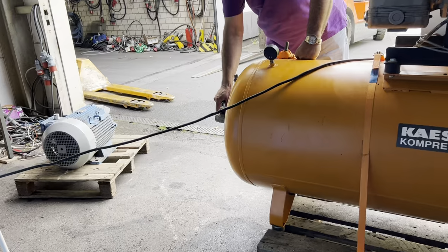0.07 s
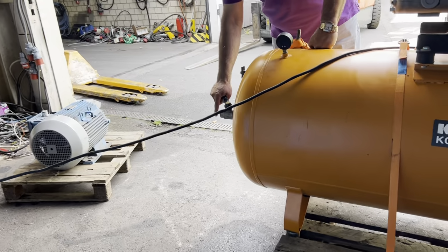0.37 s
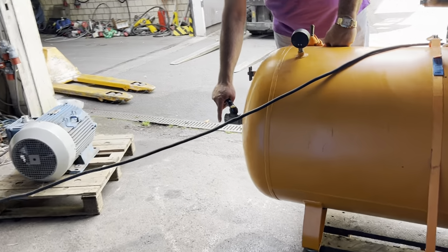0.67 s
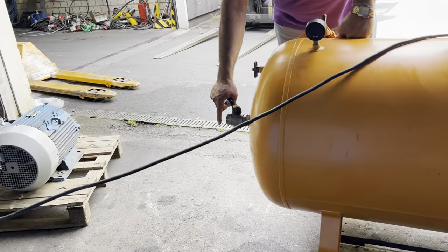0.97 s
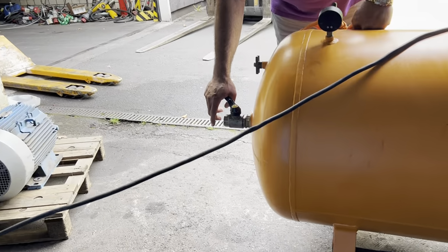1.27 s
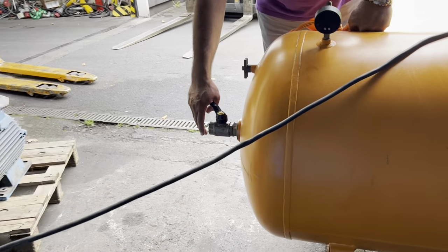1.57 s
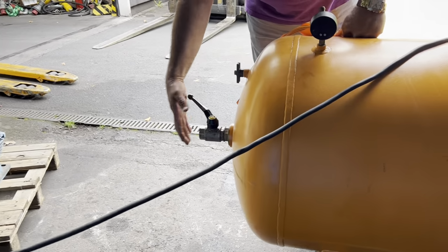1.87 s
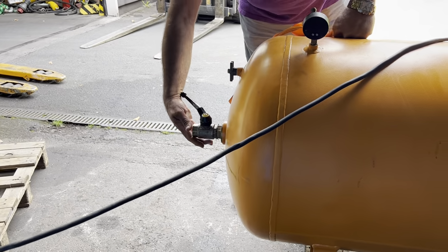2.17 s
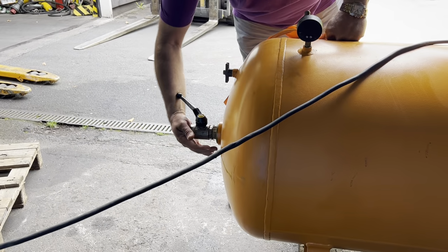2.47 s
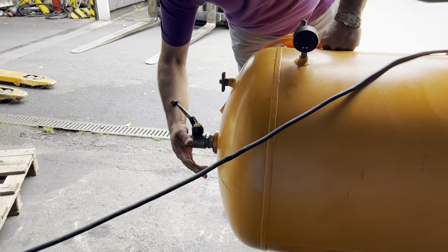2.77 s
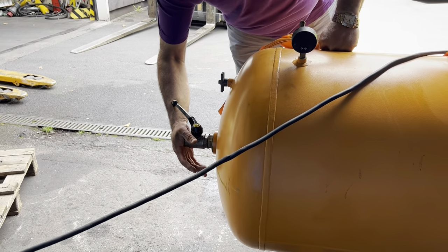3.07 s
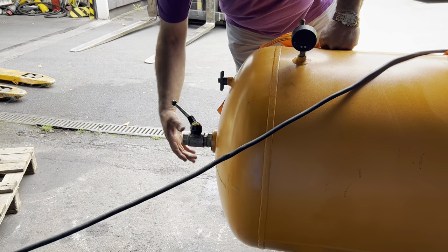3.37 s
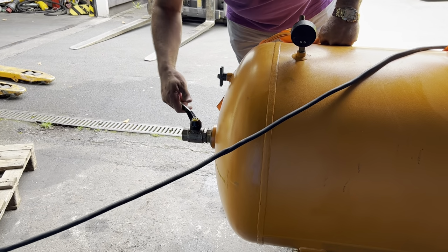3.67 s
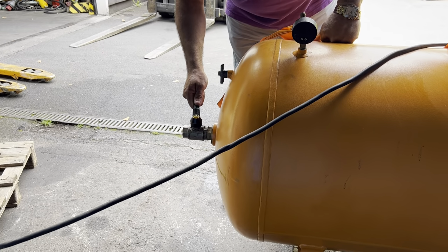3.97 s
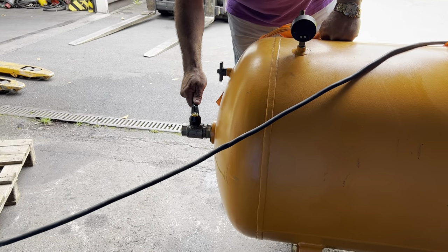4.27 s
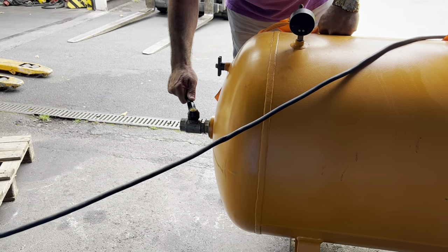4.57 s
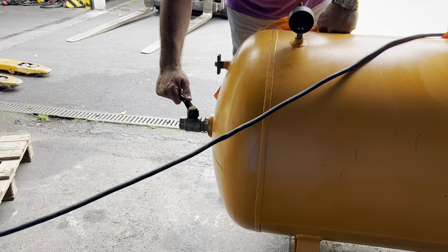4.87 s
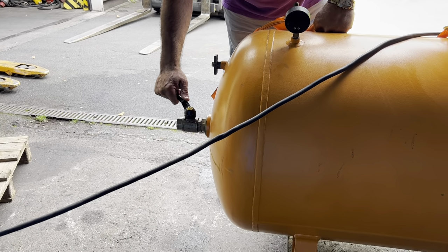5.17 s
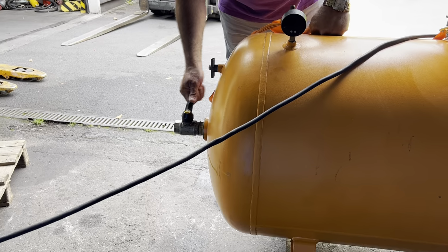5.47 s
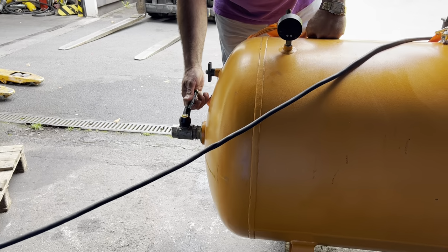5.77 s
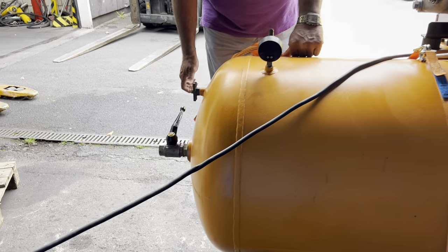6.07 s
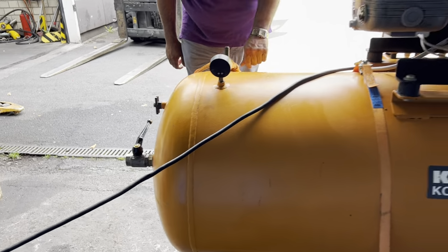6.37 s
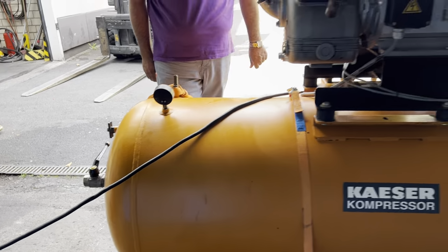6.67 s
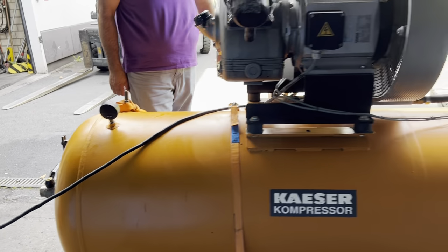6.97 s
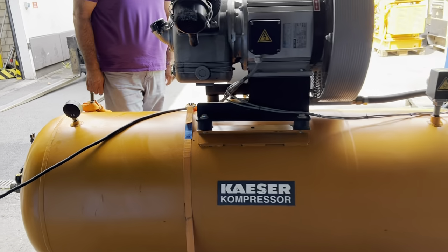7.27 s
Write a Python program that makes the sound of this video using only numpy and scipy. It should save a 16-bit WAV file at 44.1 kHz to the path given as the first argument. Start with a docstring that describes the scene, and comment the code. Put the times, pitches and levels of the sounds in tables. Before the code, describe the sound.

In a walled concrete yard, a diesel engine idles steadily while air roars and hisses from a tank valve close to the microphone. The first burst is long and gets choked by a hand, the second is a short puff, and the third follows a brief gap as the lever is opened again. Once the valve closes, only the engine remains, chugging and clattering, with a few sharper knocks.

```python
"""Compressed air bursts from the ball valve of a compressor tank in a walled, concrete yard.
A hand works the lever twice; in the first release the palm covers the outlet and lets go, so three
bursts are heard. The jet roars in the outlet pipe, hisses off the hand and the concrete, and fizzes at
the valve seat, weaker as the tank empties. Behind it a diesel engine idles throughout. The stereo
microphone, two closely spaced ports, moves slowly about a metre past the tank and steps back."""
import sys
import numpy as np
from scipy import signal
from scipy.fft import rfft, irfft
from scipy.io import wavfile
from scipy.ndimage import uniform_filter1d

SR = 44100
rng = np.random.default_rng(int(sys.argv[2]) if len(sys.argv) > 2 else 0)


def wrap_up_sound(samples):
    """Save the sound to the file named by the first command line argument, as 16-bit audio."""
    columns = np.atleast_2d(samples).T
    # keep every value between -1 and 1, then stretch to whole-number steps
    tamed = np.clip(columns, -1, 1)
    steps = np.round(tamed * 32767).astype(np.int16)
    wavfile.write(sys.argv[1], SR, steps)


N = 322371
T = np.arange(N) / SR
FRAME, HOP = 1024, 256
HZ = np.fft.rfftfreq(FRAME, 1 / SR)
FRAME_S = np.arange(N // HOP + 5) * HOP / SR
FIRING_HZ = 24.744

# the palm closes over the outlet, slips a little and lets go: t/s, cover/0-1
PALM_COVER = [(2.0, 0.15), (2.17, 0.21), (2.5, 0.15), (2.72, 0.48), (2.84, 0.82), (2.99, 0.97), (3.1, 0.9),
              (3.15, .66), (3.21, 0.74), (3.3, 0)]
# how openly the microphone faces the engine block: t/s, share/0-1
FACING_ENGINE = [(0, 0.5), (2.4, .42), (4.3, .42), (5.8, 0.53), (6.2, 0.58), (6.7, 0.93)]
# stereo image of engine and draught: f/Hz, left minus right/dB, left lead/rad, likeness/0-1
YARD_IMAGE = [(50, -1, 0, .98), (170, -3, -.35, .97), (500, -2.7, -.6, .65), (900, -3.4, -1, .35),
              (1750, -1.5, -1, .55), (3400, 1, 1.3, .2), (4600, 3, 1, .6), (5800, 9, -2, .5),
              (7000, 1.6, 0, .8), (8800, 1, -1.7, .8), (9700, 0, -3.1, .99), (10600, 0, -3.2, .99),
              (11200, 0, -4, .82), (12700, 0, -6.2, .95), (14400, 0, -6.3, .96), (15700, 0, -8.5, .92)]


def air_jet(flutter_db=0.18, flutter_hz=40):
    """Roar in the pipe, hiss off hand and concrete, fizz at the seat: all share resonances and flutter."""
    # spectra of the three parts: f/Hz, level/dB
    roar_spectrum = [(100, -49), (350, -35), (900, -13.5), (1300, -8), (1900, -1.5), (2700, 1.5),
                     (3600, -1), (4400, -8), (7000, -46)]
    hiss_spectrum = [(1500, -12), (3200, -5.5), (4200, 2), (5200, 3.5), (6400, 0), (7400, -3.5),
                     (9500, -11.5), (12000, -120)]
    fizz_spectrum = [(3000, -21), (7500, 3), (9800, -3.5), (11400, 5), (12700, 0.5), (14000, -0.5),
                     (15600, -1.5), (17000, -25)]
    shaping = outlet() * whistles() * ground_bounce() * reflections() * shimmer()
    roar_gain = flow(level_db=-21.5, lever_power=0.85, sag_db_per_s=-1.09,
                     palm_db=-22.0, palm_power=1.18, splash_db=3.0, puff_db=2.5, yard_db=-10.5)
    hiss_gain = flow(level_db=-22.0, lever_power=1.19, sag_db_per_s=-1.54,
                     palm_db=-20, palm_power=1.42, splash_db=1.1, puff_db=-0.5, yard_db=-6.0)
    fizz_gain = flow(level_db=-27.0, lever_power=0.95, sag_db_per_s=-0.77,
                     palm_db=-8.0, palm_power=1.0, splash_db=3.5, puff_db=5.5, yard_db=-14)
    roar = turbulence(roar_spectrum, shaping, roar_gain, eddies_db=0.9, surge_db=-0.13)
    hiss = turbulence(hiss_spectrum, shaping, hiss_gain, eddies_db=1.97, surge_db=0.5)
    fizz = turbulence(fizz_spectrum, shaping, fizz_gain, eddies_db=1.9, surge_db=0.4)
    return (roar + hiss + fizz) * amp(flutter_db * wander(flutter_hz))


def turbulence(spectrum, shaping, gain, eddies_db, surge_db, surge_hz=14):
    """One region of the jet: noise blotched by eddies, surging a little about the flow."""
    # stereo image of the jet: f/Hz, left minus right/dB, left lead/rad, likeness/0-1
    jet_image = [(100, -2, 0, .95), (600, -1, -.6, .5), (1000, 0, .7, .6), (2000, -.3, .6, .62),
                 (2800, 1, 1.6, .58), (4000, 3, 1.6, .55), (5400, 11, 1.8, .2), (6400, 7, .7, .25),
                 (7100, 4, -.1, .6), (8800, 1.5, -1.9, .7), (9600, 0, -3.1, .99), (10500, 0, -3.15, .99),
                 (11200, 0, -4, .8), (12700, 0, -6.2, .93), (14400, 0, -6.3, .95), (15700, 0, -8.6, .88)]
    colour = amp(over_hz(spectrum, HZ)) * shaping
    colour /= np.linalg.norm(colour, axis=1, keepdims=True)  # resonances share out the flow's power
    surge = amp(surge_db * wander(surge_hz))
    eddies = amp(eddies_db * patches(frames=7, bins=9))
    return gain * surge * noise(colour * eddies, jet_image)


def flow(level_db, lever_power, sag_db_per_s, palm_db, palm_power, splash_db, puff_db, yard_db):
    """Jet gain: it follows the lever, sags as air is spent, chokes under the palm and puffs when freed."""
    # the fingers feel their way into the jet: t/s, splash strength/factor
    fingers = [(.8, 0.65), (1.7, 1.18), (2.1, 0.93), (2.45, 0.026)]
    puff_s, yard_t60_s = 0.074, 0.68
    opening = lever(T)
    spent_s = np.cumsum(opening) / SR
    since_freed = T - PALM_COVER[-1][0]
    puff = (since_freed > 0) * np.exp(-abs(since_freed) / puff_s)  # air dammed behind the palm
    hand_db = palm_db * palm(T) ** palm_power + splash_db * over_time(fingers, T) + puff_db * puff
    db = level_db + sag_db_per_s * spent_s + hand_db
    direct = uniform_filter1d(opening ** lever_power * amp(db), size=700)
    # the yard walls hold each burst for a moment
    decay = np.exp(-2 * np.log(1000) / (yard_t60_s * SR))
    yard_power = signal.lfilter([1 - decay], [1, -decay], (amp(yard_db) * direct) ** 2)
    return np.sqrt(direct ** 2 + yard_power)


def lever(t, crack_s=0.15, shut_s=0.1):
    """Opening of the valve, 0-1: it cracks, swings wide, holds and shuts."""
    # pulls: crack t/s, opening while cracked/0-1, swing t/s, swing time constant/s, shut t/s
    pulls = [(-.1, 0.13, 0.13, 0.16, 3.77), (4.41, 0.37, 4.675, 0.065, 5.316)]
    opening = 0
    for crack_at, seep, swing_at, swing_s, shut_at in pulls:
        cracked = 1 - np.exp(-np.maximum(t - crack_at, 0) / crack_s)
        swung = 1 - np.exp(-np.maximum(t - swing_at, 0) / swing_s)
        held = np.exp(-(np.maximum(t - shut_at, 0) / shut_s) ** 2)
        opening += (seep * cracked + (1 - seep) * swung) * held
    return np.clip(opening, 0, 1)


def palm(t):
    """How far the palm covers the outlet, 0-1."""
    return over_time(PALM_COVER, t)


def outlet(ring_cracked=1.1, ring_open=1.0, palm_damping=0.2):
    """Pipe and valve resonate with the grip: most when barely open, less under the palm."""
    # outlet resonances: f/Hz, width/Hz, then base lift/dB for each of the seven grips
    resonances = [(1000, 220, 1.5, 3.5, -0.5, -4.5, -6.5, -8.5, -4.5),
                  (1030, 60, -2.5, -0.5, 1.5, 6.0, 7.5, 8.5, 2.0),
                  (1120, 60, 0.5, -2.5, 1.5, 3.0, 6.5, 6.0, 0.0),
                  (1240, 90, 1.0, 2.5, 1.0, -0.5, 5.0, 2.5, 4.5),
                  (1435, 90, 1.5, 0.5, 0.5, 3.5, 3.5, -1.0, -3.0),
                  (1585, 90, 1.0, -0.5, -0.5, 3.0, 4.5, 4.0, 4.0),
                  (1705, 60, 0.0, 1.0, 0.0, -5.5, 1.5, 0.5, -0.5),
                  (1825, 60, 0.0, -0.5, 1.0, 3.5, 1.5, 7.5, 1.0),
                  (1975, 90, 4.0, 1.5, 6.0, 6.0, 4.0, 5.5, 5.0),
                  (2185, 60, 0.0, -1.5, 2.0, 6.0, -0.5, 2.5, 3.0),
                  (2380, 60, 2.5, 1.0, 0.5, 1.5, 0.5, 3.0, 5.5),
                  (2620, 140, 1.5, 2.5, 1.5, 0.0, -0.5, -0.5, 0.5),
                  (2800, 60, 1.0, 1.0, 2.5, 1.0, 1.0, 5.0, 7.5),
                  (3070, 220, -0.5, -1.0, 1.5, 2.0, 0.0, 2.5, 3.0),
                  (3385, 90, 2.0, 2.0, 1.0, 1.5, 0.5, 5.0, 6.0),
                  (3685, 220, 2.0, 3.5, 2.0, 2.0, -0.5, 0.5, 1.0),
                  (3910, 90, 2.5, 0.5, 2.0, -2.5, 1.0, -5.0, -4.0),
                  (4225, 60, 1.5, 0.5, 1.5, 2.0, 1.5, 5.0, 4.0),
                  (4585, 90, 0.0, 0.5, 1.5, 5.5, 5.0, 3.0, 1.5),
                  (4840, 140, 2.0, 5.0, 0.5, -1.0, -0.5, -5.0, -4.5),
                  (5050, 90, 6.0, 2.0, 3.0, 1.0, 3.5, 5.0, 0.5),
                  (5380, 90, 4.5, 4.0, -0.5, 3.0, 1.5, 3.0, 3.5),
                  (5485, 60, -5.5, -3.5, -6.0, -1.5, -0.5, -3.0, -0.5),
                  (5620, 90, 0.5, 1.5, 0.0, 4.5, 6.0, 0.5, 7.0),
                  (5785, 60, 0.0, 0.5, 0.0, -0.5, 0.0, 8.0, 2.0),
                  (6025, 220, -0.5, -0.5, 0.0, 0.0, 5.5, 1.0, 0.5),
                  (6445, 90, 0.5, 0.0, 2.5, 2.5, 2.0, 4.0, 4.0),
                  (7240, 400, 2.5, 2.0, 4.0, 0.5, 0.0, 1.5, 2.0),
                  (7885, 220, 0.0, 1.5, 3.5, 1.5, 1.0, 1.5, -0.5),
                  (8755, 400, 2.5, 2.0, 0.0, 2.5, 3.0, 2.5, 2.5)]
    # how the valve is held: t/s, grip/index (0 swinging open, 1 wide open, 2 fingers near the jet,
    # 3 fingers in it, 4 palm closing in, 5 palm beside it, 6 part open)
    grips = [(.45, 0), (1.05, 1), (1.55, 2), (2.05, 3), (2.55, 4), (3.0, 4), (3.28, 5), (4.0, 5), (4.4, 6)]
    t = FRAME_S[:, None]
    ring = (ring_cracked + (ring_open - ring_cracked) * lever(t)) * (1 - palm_damping * palm(t))
    modes = np.array(resonances, float)
    shapes = bell(modes[:, :1], modes[:, 1:2])
    lifts_db = crossfade(grips, FRAME_S, states=7) @ modes[:, 2:].T
    return amp(ring * (lifts_db @ shapes))


def whistles():
    """Airy whistles and spurts flare as the jet catches an edge of the valve or the hand."""
    # flares: t/s, half length/s, f/Hz, width/Hz, lift/dB
    flares = [(.05, .12, 2650, 450, 7), (.2, .1, 2020, 120, 5.5), (.55, .07, 1950, 100, 4),
              (2.65, .11, 6120, 170, 5), (3.15, .03, 3000, 1100, 6), (3.31, .025, 5820, 450, 9),
              (3.29, .05, 1150, 600, 5), (1.7, .4, 1980, 90, 3), (4.8, .45, 1980, 160, 4.5),
              (4.55, .15, 3000, 200, 4)]
    t = FRAME_S[:, None]
    return amp(sum(db * swell(t, at, half_s) * bell(hz, width) for at, half_s, hz, width, db in flares))


def ground_bounce(share=0.16):
    """The bounce off the concrete combs the jet; the teeth slide down as the microphone nears."""
    # lag of the bounce behind the direct sound: t/s, delay/ms
    bounce_delay = [(0, 1.53), (.35, 1.58), (.8, 1.74), (1.6, 2.04), (2.1, 2.09), (3.5, 2.07), (5, 2.03)]
    return abs(1 + share * delayed(over_time(bounce_delay, FRAME_S[:, None])))


def reflections():
    """Nearby surfaces comb the spectrum; the teeth slide while the microphone moves."""
    # microphone path: t/s, position/m
    path = [(0, 0.12), (1.9, 0.77), (3, 0.88), (5.5, 1.214), (7.3, 0.25)]
    # echoes off the surfaces: delay/ms, share/0-1, drift/(ms per m)
    echoes = [(6.3, .14, .5), (11.2, .19, -.7), (17.5, .17, .9)]
    metres = over_time(path, FRAME_S[:, None])
    return abs(1 + sum(share * delayed(ms + drift * metres) for ms, share, drift in echoes))


def shimmer(depth_db=1.5):
    """Fine resonances come and go at random, as when hand and microphone shift."""
    return amp(depth_db * patches(frames=40, bins=3))


def exhaust(cycles, waver_db=1.06, waver_hz=1.943, scatter_hz=900, top_harmonic=40):
    """Each firing of the diesel sends a falling bark and then a boom out of the silencer."""
    # exhaust note and one faint whine: harmonic/number, then level/dB at each of four positions
    note = [(2, -67.5, -61.5, -63.5, -64.0), (3, -65.5, -63.5, -62.5, -71.0),
            (4, -49.0, -67.0, -68.0, -55.0), (5, -47.5, -44.5, -45.5, -44.5),
            (6, -65.5, -59.0, -59.0, -61.5), (7, -43.5, -40.0, -42.0, -42.0),
            (8, -42.5, -43.5, -45.5, -41.5), (9, -50.0, -44.5, -46.5, -49.5),
            (10, -48.5, -49.5, -50.5, -51.0), (11, -61.0, -50.5, -51.5, -58.5),
            (12, -57.5, -54.0, -56.0, -50.5), (13, -46.0, -44.0, -45.5, -42.0),
            (14, -48.5, -44.5, -46.5, -43.5), (15, -51.5, -53.0, -52.0, -54.5),
            (16, -53.0, -56.5, -55.5, -50.0), (17, -49.5, -44.5, -46.0, -50.5),
            (18, -48.5, -49.0, -51.5, -45.5), (19, -58.5, -51.5, -51.0, -50.5),
            (20, -49.0, -49.5, -52.0, -58.0), (21, -49.0, -56.5, -60.5, -53.0),
            (22, -56.5, -54.5, -58.5, -59.5), (23, -56.5, -54.0, -57.0, -60.0),
            (24, -55.5, -52.5, -50.5, -52.5), (25, -59.5, -58.5, -60.5, -60.0),
            (26, -65.5, -58.0, -60.0, -58.5), (27, -58.5, -61.5, -61.5, -67.0),
            (28, -55.5, -57.0, -58.0, -55.5)]
    whine = (39, -75, -70, -66, -53)
    # microphone: t/s, position/index (0 walking up, 1 nearing, 2 beside the valve, 3 stepped back)
    positions = [(.35, 0), (1.5, 1), (2.0, 1), (2.8, 2), (5.9, 2), (6.7, 3)]
    # arrival of the bark after the firing: f/Hz, lag/cycles
    bark_lag = [(250, .32), (330, .24), (480, .1), (560, .15), (650, .35), (1000, .35)]
    boom_top_hz, boom_lag_cycles = 235, 0.82
    slap_cycles, slap_rad = 0.27, 0.8  # the yard repeats each bark
    overtone_db, db_per_octave = -60, -21  # above the listed lines the note dies away evenly
    blend = crossfade(positions, T, states=4)
    levels_db = {row[0]: np.array(row[1:]) for row in [*note, whine]}
    lag_phase, sound = 0, np.zeros((2, N))
    for k in range(2, top_harmonic + 1):
        hz = np.array([k * FIRING_HZ])
        is_bark = hz[0] > boom_top_hz
        lag = over_hz(bark_lag, hz) if is_bark else boom_lag_cycles
        lag_phase += 2 * np.pi * lag  # lag is the slope of phase from line to line
        rolloff_db = overtone_db + db_per_octave * np.log2(k / note[-1][0])
        db = blend @ levels_db[k] if k in levels_db else rolloff_db
        gain = amp(db + waver_db * wander(waver_hz))
        # reflections in the yard turn the higher lines differently at each port
        stray = np.array([wander(top_hz=0.96) for _ in range(2)]) * hz / scatter_hz
        slap = slap_rad * np.sin(2 * np.pi * k * slap_cycles) * is_bark
        phase = 2 * np.pi * (k * cycles - boom_lag_cycles) - lag_phase + stray + slap
        ports = port_gains(YARD_IMAGE, hz)
        sound += gain * abs(ports) * np.cos(phase + np.angle(ports))
    return np.sqrt(2) * sound


def clatter(cycles, level_db=-41.5, facing_db=3.5, blotch_db=0.9, throb_db=1.3):
    """The engine's mechanical hiss throbs with the firings."""
    # engine hiss and yard air: f/Hz, level/dB
    spectrum = [(60, -27), (130, -2.5), (450, 1), (700, -1.5), (900, -3), (1650, -9), (2300, -11),
                (3600, -13.5), (5000, -13.5), (6500, -13), (7200, -16), (8200, -12.5), (9300, -13.5),
                (11500, -13.5), (13800, -19), (16000, -22)]
    blotches_db = blotch_db * patches(frames=40, bins=6)
    colour = amp(over_hz(spectrum, HZ) + blotches_db) * reflections() * tank_bounce()
    throb = amp(throb_db * np.cos(2 * np.pi * (cycles - 0.33)))
    gain = amp(level_db + facing_db * over_time(FACING_ENGINE, T))
    return gain * unit_rms(throb * noise(colour, YARD_IMAGE))


def knock(cycles, level_db=-52.5, facing_db=8.0, uneven_db=1.5, rattle_db=1.2):
    """Every firing raps the engine block: a quick rise and a rattling decay, each a little different."""
    # diesel knock: f/Hz, level/dB
    spectrum = [(400, -6), (750, -8), (1150, 3), (1750, 2), (2300, -5), (3000, -21), (5000, -17)]
    firing, age = np.divmod(cycles + 0.85, 1)  # age in firing cycles
    rap = 0.14 + strike(age, rise=0.08, decay=0.42)
    strength_db = uneven_db * rng.standard_normal(int(firing[-1]) + 1)[firing.astype(int)]
    strength_db += rattle_db * unit_rms(uniform_filter1d(rng.standard_normal(N), size=180))
    block = noise(amp(over_hz(spectrum, HZ)) * reflections() * tank_bounce(), YARD_IMAGE)
    gain = amp(level_db + facing_db * over_time(FACING_ENGINE, T))
    return gain * unit_rms(rap * amp(strength_db) * block)


def hard_knocks(rise_s=0.002, decay_s=0.0082):
    """Near the end a few firings rap more sharply and brightly than the rest."""
    # hard raps: t/s, level before the envelope/dB
    raps = [(6.191, -38), (6.231, -40), (6.311, -45), (6.433, -37), (6.516, -37), (6.635, -41),
            (6.716, -41), (6.757, -39)]
    # their spectrum: f/Hz, level/dB
    spectrum = [(900, -22), (1700, 0), (2400, 6), (3300, -20), (6000, -40)]
    gain = sum(amp(db) * strike(np.maximum(T - at, 0), rise_s, decay_s) for at, db in raps)
    return gain * noise(amp(over_hz(spectrum, HZ)), YARD_IMAGE)


def tank_bounce():
    """Bounces off the tank lift bands of the engine noise, which slide as the microphone moves."""
    # bright bands: width/Hz, curve of (t/s, f/Hz, lift/dB)
    bands = [(250, [(5.6, 1750, 2), (6.1, 1660, 5), (6.6, 1650, 0)]), (400, [(5.3, 4450, 3),
             (5.75, 4450, 7), (6.2, 4550, 0)]), (620, [(5.6, 5600, 1.5), (5.95, 5700, 5), (6.2, 5300, 5),
             (6.5, 5080, 6), (6.7, 4700, 6), (7.3, 4780, 5)]), (500, [(6.3, 6400, 0), (6.6, 6000, 4.5),
             (7.05, 5780, 6), (7.3, 5900, 4)]), (650, [(5.6, 8200, 4), (6.1, 7950, 5), (6.62, 7480, 5),
             (6.88, 8130, 5), (7.3, 7850, 4)])]
    t = FRAME_S[:, None]
    return amp(sum(over_time(curve, t, column=2) * bell(over_time(curve, t), width)
                   for width, curve in bands))


def draught(level_db=-56):
    """A faint steady draught rumbles on the microphone, and one gust brushes it."""
    # wind rumble: f/Hz, level/dB
    spectrum = [(15, -30), (45, -4), (80, 20), (130, -1), (300, -33)]
    # air turned aside by the hand: t/s, half length/s, level/dB
    gust = (2.12, 0.076, -58)
    at, half_s, gust_db = gust
    gain = amp(level_db) + amp(gust_db) * swell(T, at, half_s)
    return gain * noise(amp(over_hz(spectrum, HZ)), YARD_IMAGE)


def noise(colour, image):
    """Stereo noise of rms 1 with a steady or moving colour, partly alike at the two ports."""
    a, b, c, d = rng.standard_normal((4, len(FRAME_S), len(HZ)))
    likeness = over_hz(image, HZ, column=3)
    left = a + 1j * b
    right = likeness * left + np.sqrt(1 - likeness ** 2) * (c + 1j * d)
    spectra = np.array([left, right]) * colour * port_gains(image, HZ)[:, None]
    _, sound = signal.istft(spectra.swapaxes(1, 2), nperseg=FRAME, noverlap=FRAME - HOP)
    return unit_rms(sound[:, :N])


def port_gains(image, hz):
    """Complex gain of the left and right microphone port at each frequency."""
    half = amp(over_hz(image, hz) / 2) * np.exp(0.5j * over_hz(image, hz, column=2))
    pair = np.array([half, 1 / half])
    return pair / np.sqrt(np.mean(abs(pair) ** 2, axis=0))


def wander(top_hz):
    """Slow random drift at every sample, rms about 1."""
    rates = np.geomspace(top_hz / 10, top_hz, num=20)[:, None]
    waves = np.sin(2 * np.pi * (rates * FRAME_S + rng.random(rates.shape))) / np.sqrt(rates)
    return np.interp(T, FRAME_S, unit_rms(waves.sum(0)))


def patches(frames, bins):
    """Random blotches over time and frequency, rms 1."""
    field = rng.standard_normal((len(FRAME_S), len(HZ)))
    return unit_rms(uniform_filter1d(uniform_filter1d(field, frames, axis=0), bins, axis=1))


def bell(hz, width_hz):
    """Shape of one resonance over frequency, top 1."""
    return 1 / (1 + (2 * (HZ - hz) / width_hz) ** 2)


def delayed(ms):
    """Frequency response of a delay."""
    return np.exp(-2j * np.pi * HZ * ms / 1000)


def swell(t, at, half_s):
    """Smooth rise and fall, top 1."""
    return np.exp(-((t - at) / half_s) ** 2)


def strike(age, rise, decay):
    """Envelope of one rap."""
    return (1 - np.exp(-age / rise)) * np.exp(-age / decay)


def crossfade(curve, t, states):
    """Weights of numbered states as a curve glides between them."""
    return np.maximum(1 - abs(over_time(curve, t)[:, None] - np.arange(states)), 0)


def over_hz(rows, hz, column=1):
    """Reads one column of a table on a log-frequency axis."""
    columns = np.transpose(rows)
    return np.interp(np.log(hz + 1), np.log(columns[0] + 1), columns[column])


def over_time(rows, t, column=1):
    """Reads one column of a table at times t."""
    columns = np.transpose(rows)
    return np.interp(t, columns[0], columns[column])


def amp(db):
    """Decibels to gain."""
    return 10 ** (np.asarray(db) / 20)


def unit_rms(x):
    """Scales to rms 1."""
    return x / np.sqrt(np.mean(x ** 2) + 1e-20)


def scene():
    """Escaping air in front, the idling diesel behind, a slight draught on the microphone."""
    firing_hz = FIRING_HZ * (1 + 0.001 * wander(top_hz=8))
    cycles = 0.036 + np.cumsum(firing_hz) / SR
    return air_jet() + exhaust(cycles) + clatter(cycles) + knock(cycles) + hard_knocks() + draught()


def record(dry, low_cut_hz=36, high_cut_hz=15800):
    """The low cut and the band limit of the recorder."""
    hz = np.fft.rfftfreq(N, 1 / SR)
    thinned = irfft(rfft(dry) * hz ** 4 / (hz ** 4 + low_cut_hz ** 4), N)
    band_limit = signal.firwin(511, high_cut_hz, window=("kaiser", 9), fs=SR)
    return signal.oaconvolve(thinned, band_limit[None], "same")


dry = scene()
out = record(dry)
wrap_up_sound(out)
```